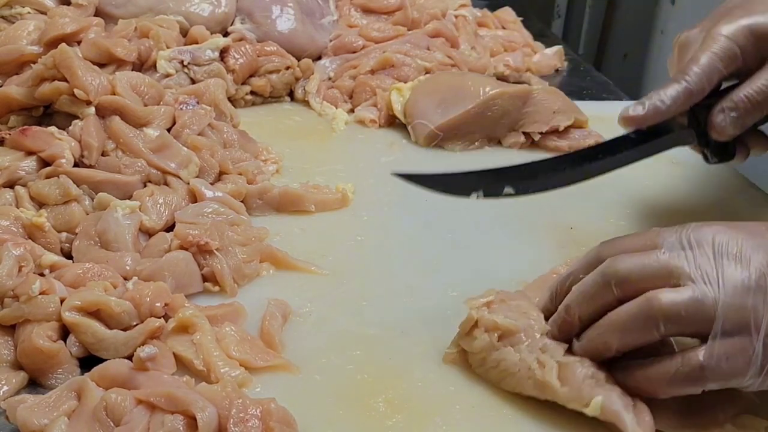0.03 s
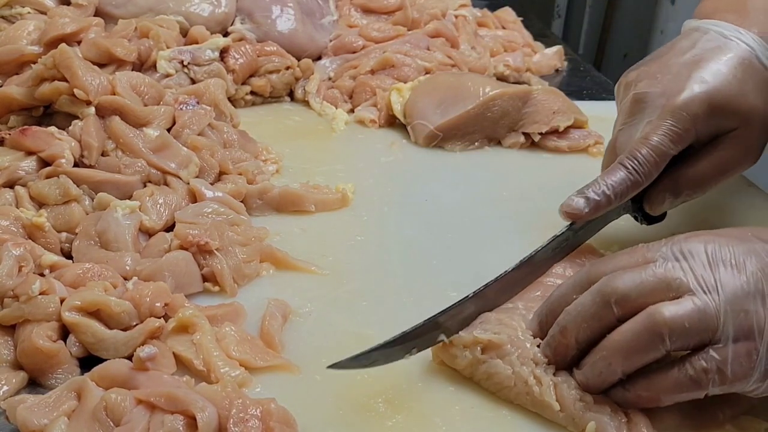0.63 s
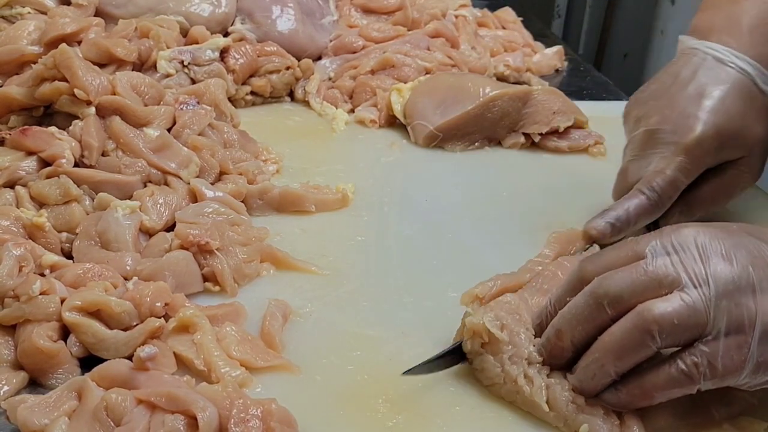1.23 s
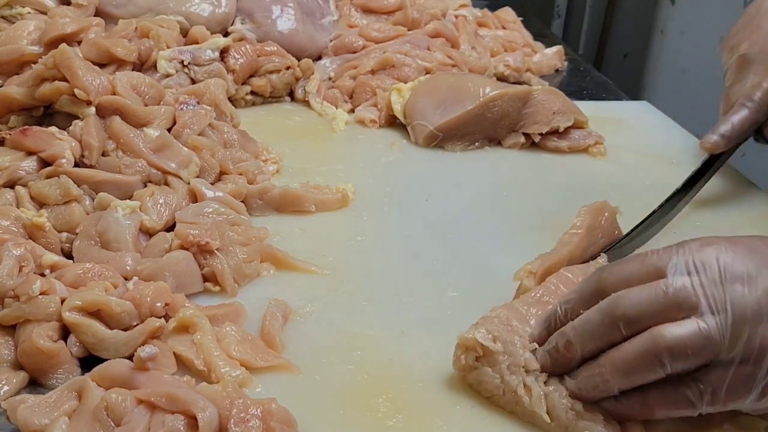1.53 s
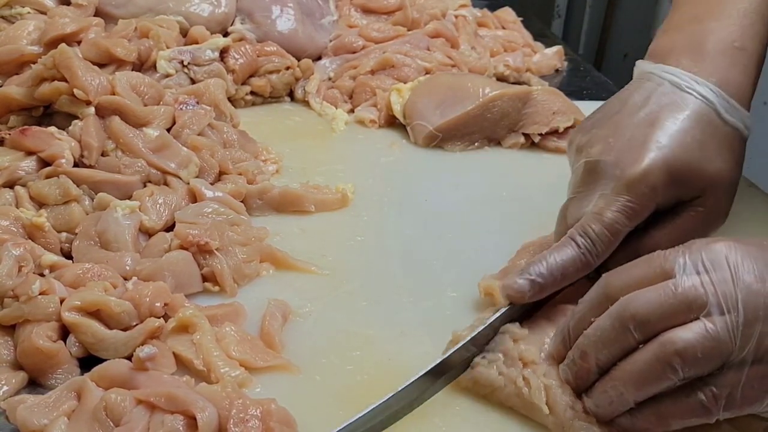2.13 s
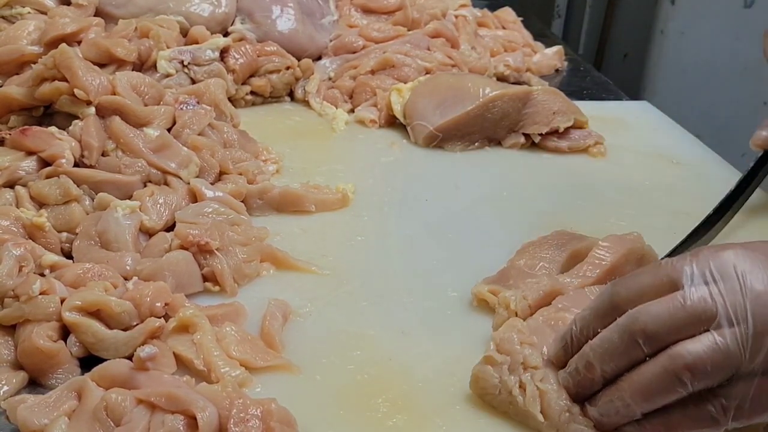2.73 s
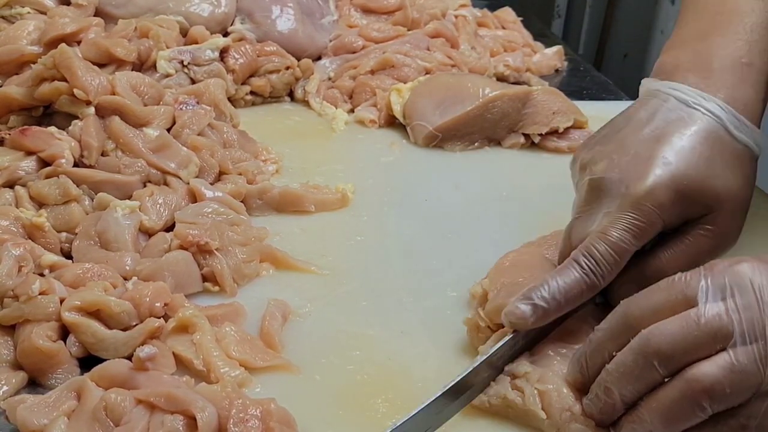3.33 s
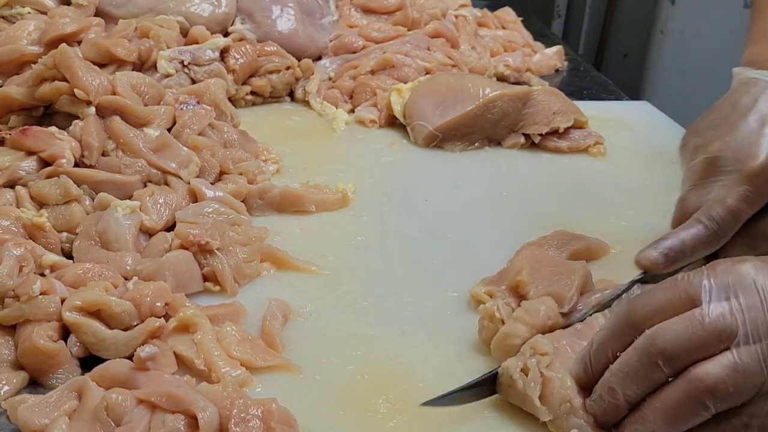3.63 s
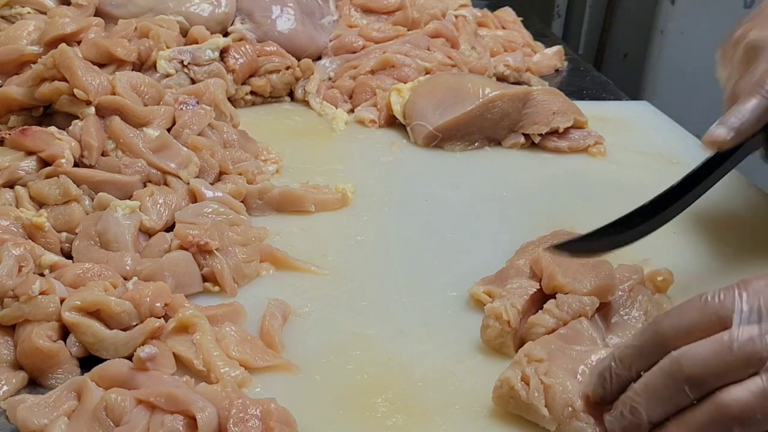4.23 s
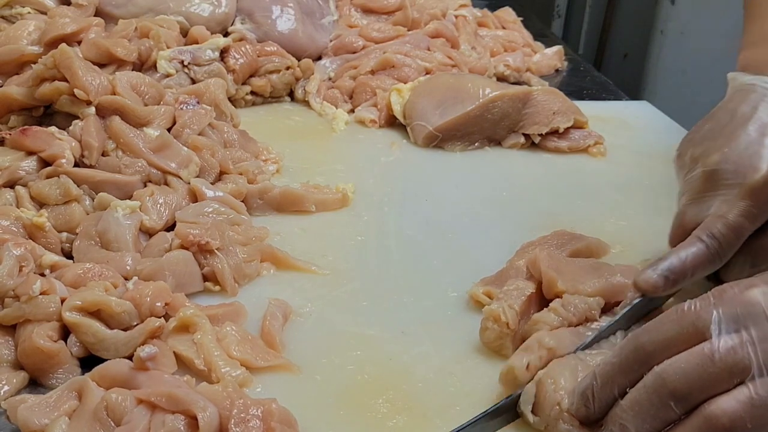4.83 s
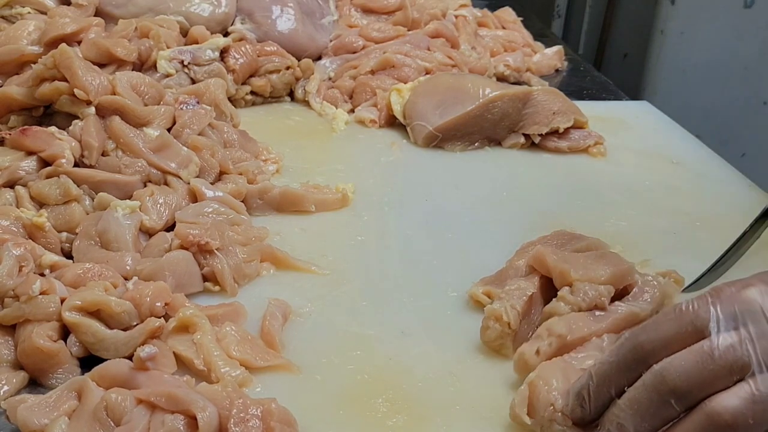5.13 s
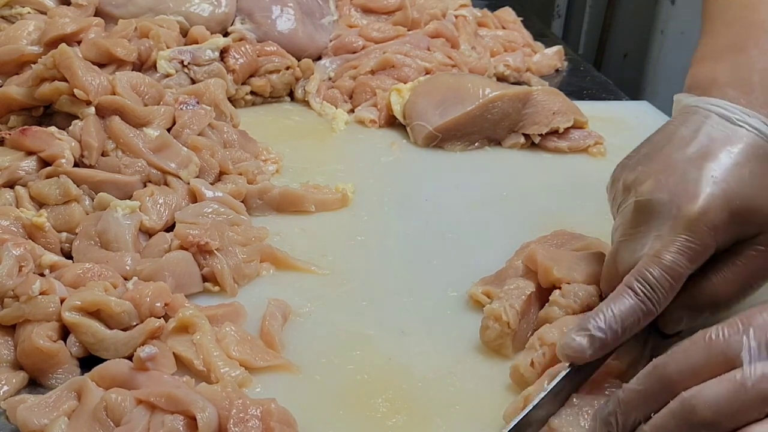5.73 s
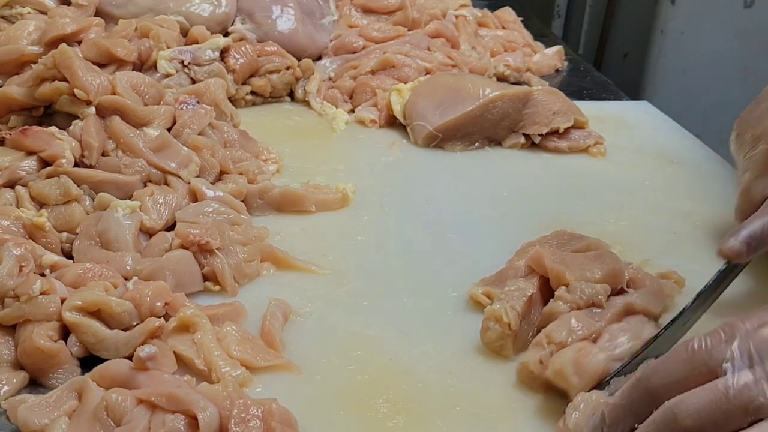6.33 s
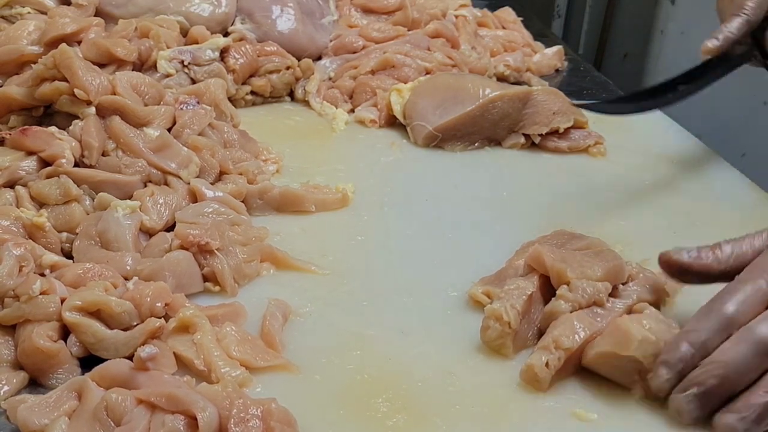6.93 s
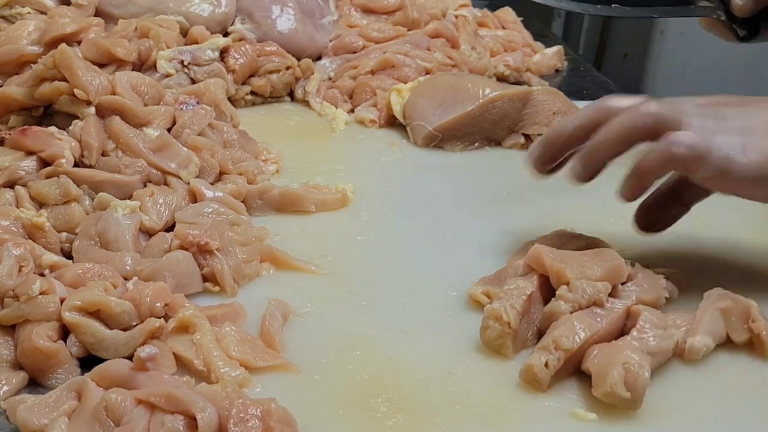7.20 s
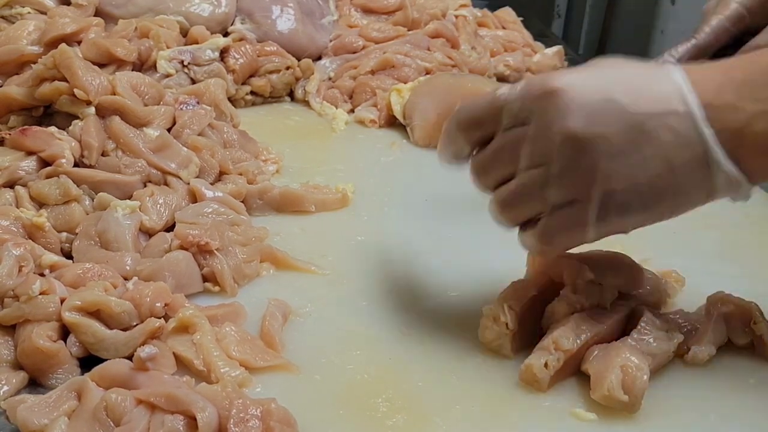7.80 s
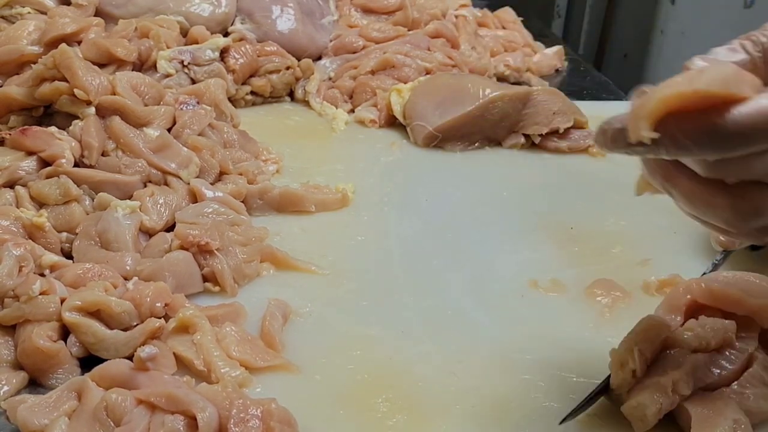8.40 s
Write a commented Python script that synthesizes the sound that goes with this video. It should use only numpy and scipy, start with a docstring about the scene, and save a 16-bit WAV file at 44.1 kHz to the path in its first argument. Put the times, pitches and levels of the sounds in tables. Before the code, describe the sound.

Over humming kitchen refrigerators, a blade taps and swishes through raw chicken, then clacks down and scrapes briefly across the cutting board.

```python
"""Slicing raw chicken

A knife slices raw chicken on a plastic board, in a kitchen where refrigeration units hum.
In each cut the edge knocks on the board and is drawn back with a soft swish, while films of
juice part and crackle. Then a gloved hand gathers the strips, and the blade clacks down and
scrapes under them."""
import sys
import numpy as np
from scipy import signal
from scipy.fft import rfft, irfft
from scipy.io import wavfile

SR = 44100
rng = np.random.default_rng(int(sys.argv[2]) if len(sys.argv) > 2 else 0)


def persist_wave(psi):
    """Save psi, clipped to +-1, as 16-bit WAV."""
    counts = np.round(np.clip(psi, -1, 1) * 32767).astype(np.int16)
    wavfile.write(sys.argv[1], SR, np.atleast_2d(counts).T)


N = 377496
TIME = np.arange(N) / SR
FREQS = np.fft.rfftfreq(N, 1 / SR)
TOP_HZ = 15900
CUT_ATTACK_S = .15  # the hand gathers speed

# Stereo image of the rubs and fizz on the board. Each row: frequency in Hz, left-right likeness (0-1).
BOARD_LIKENESS = [(200, 0.98), (1200, 1), (3000, 0.31), (7000, 0), (15000, 0)]
# The slicing strokes. Each row: start in seconds, length in seconds, rub level in dB,
# treble tilt in dB at the start, treble tilt in dB at the end, wet fizz level in dB.
CUTS = [(1.03, 0.43, -51.5, 14, -2.5, -65), (2.143, 0.51, -53, 9, -2, -63), (3.433, 0.43, -52.5, 3, 2, -64),
        (4.673, 0.45, -53, 4, 5, -67), (6.19, 0.36, -54.5, -14, 7, -63)]


def amp(db):
    """Decibels to gain."""
    return 10 ** (np.asarray(db) / 20)


def unit(x):
    """Scales to rms 1."""
    return x / np.sqrt(np.mean(x ** 2) + 1e-30)


def read(points, hz):
    """Reads a curve on a logarithmic frequency axis."""
    f, value = np.transpose(points)
    return np.interp(np.log(hz + 1), np.log(f + 1), value)


def add(mix, start_s, sound):
    """Mixes a sound in at its start time."""
    part = mix[..., max(round(start_s * SR), 0):][..., :sound.shape[-1]]
    part += sound[..., :part.shape[-1]]


def envelope(start, length, attack_s, release_s):
    """A straight rise, with a dying release once the length is over."""
    age = TIME - start
    return np.clip(age / attack_s, 0, 1) * np.exp(-np.maximum(age - length, 0) / release_s)


def drift(hz):
    """Smooth random wander of rms 1, rolling off around hz."""
    t = TIME[::32]
    lowpass = np.exp(-(np.fft.rfftfreq(len(t), t[1]) / hz) ** 2)
    slow = irfft(rfft(rng.standard_normal(len(t))) * lowpass, len(t))
    return unit(np.interp(TIME, t, slow))


def grains(per_s, spread_db):
    """Two trains of tiny random impulses of uneven size."""
    size = amp(spread_db * np.minimum(rng.exponential(1, (2, N)), 4))
    return size * rng.choice([-1, 1], (2, N)) * (rng.random((2, N)) < per_s / SR)


def coloured(pair, colour_db, likeness):
    """Gives two unrelated signals a tone colour and a stereo width."""
    a, b = rfft(pair)
    same = np.clip(read(likeness, FREQS), -1, 1)
    mid, side = a * np.sqrt(1 + same), b * np.sqrt(1 - same)
    return unit(irfft(np.array([mid + side, mid - side]) * amp(colour_db), N))


def patchy(x, depth_db, width_hz, hold_s):
    """Resonances that come and go, each about width_hz wide and hold_s long."""
    hz, t, spectra = signal.stft(x, SR, nperseg=1024)
    patches = rng.standard_normal(spectra.shape[1:])
    for axis, span in enumerate([width_hz / hz[1], hold_s / t[1]]):
        count = patches.shape[axis]
        blur = np.exp(-(2 * (np.arange(count) - count // 2) / span) ** 2)
        patches = signal.fftconvolve(patches, np.expand_dims(blur, 1 - axis), "same")
    return unit(signal.istft(spectra * amp(depth_db * unit(patches)), SR)[1][:, :N])


def ring(modes, tuning, contact_s):
    """Struck modes, neighbours in opposite phase; a cushioned contact leaves the high ones quiet."""
    t = TIME[:SR // 4]
    sound = sum((-1) ** k * amp(db - 60 * t / t60) * np.sin(2 * np.pi * hz * tuning * t)
                for k, (hz, db, t60) in enumerate(modes))
    force = np.sin(np.pi * np.minimum(t / max(contact_s, 3 / SR), 1)) ** 2
    sound = signal.fftconvolve(sound, force)[:len(t)]
    return sound / abs(sound).max()


def reflections(x, predelay_s, t60s, count=1200):
    """Sparse echoes of random sign, separate for each side, each band dying at its own speed."""
    taps = np.zeros((2, SR))
    at = np.arange(count) * 20 + rng.integers(0, 20, (2, count))
    np.put_along_axis(taps, at, rng.choice([-1., 1.], at.shape), 1)
    hz, t, spectra = signal.stft(taps, SR, nperseg=256)
    tail = signal.istft(spectra * amp(-60 * t / read(t60s, hz)[:, None]), SR)[1]
    tail = np.pad(tail / np.linalg.norm(tail[0]), ((0, 0), (round(predelay_s * SR), 0)))
    return signal.fftconvolve(x, tail, axes=1)[:, :N]


def refrigeration(waver=0.097, sway_rad=0.5, waver_hz=0.42, air_db=-36.5):
    """The background bed: slightly wavering motor tones in the rush of moving air."""
    # Compressor and fan tones. Each row: frequency in Hz, rms level in dB.
    tones = [(26.9, -48), (28.6, -59), (53.8, -52.5), (57.9, -42), (80.7, -34), (119.8, -42.5),
             (146.7, -57), (161.5, -50), (173.6, -52), (240, -59.5), (242.2, -52.5), (319, -70),
             (345.9, -48.5), (403.7, -51.5), (460.9, -53.5), (485.2, -65), (663.5, -64)]
    # Rush of the fans. Each row: frequency in Hz, relative level in dB.
    air_colour = [(15, -34), (28, -16), (41, -16), (60, 1.5), (85, 0.5), (132, -6), (190, -0.5), (265, -3),
                  (340, -9), (450, -12), (560, -14.5), (900, -19.5), (1400, -18.5), (1800, -27.5),
                  (2350, -31.5), (2900, -31), (3700, -37), (4600, -39), (6200, -49), (10000, -56),
                  (15500, -59.5)]
    # Stereo image of the rush. Each row: frequency in Hz, left-right likeness (0-1).
    air_likeness = [(60, 0.8), (130, 1), (280, .88), (550, 0.24), (1200, 0.19), (3000, 0.053), (7000, 0),
                    (15000, 0)]
    hum = np.zeros(N)
    for hz, db in tones:
        gain = amp(db) * (1 + waver * drift(waver_hz))
        hum += gain * np.sin(2 * np.pi * (hz * TIME + rng.random()) + sway_rad * drift(waver_hz))
    air = coloured(rng.standard_normal((2, N)), read(air_colour, FREQS), air_likeness)
    return np.sqrt(2) * hum + amp(air_db) * air


def wetness(drying_db_per_s=13):
    """The fizz's gain: faint and fitful under the holding hand, up in each cut and squelch."""
    # Meat parts from blade, glove or board. Each row: start in seconds, length in seconds, level in dB.
    squelches = [(0.068, 0.06, -58), (0.335, 0.023, -61), (.86, .06, -64), (1.093, 0.026, -56.5),
                 (1.16, .05, -59), (2.174, .032, -46.5), (2.46, 0.032, -57), (2.55, 0.055, -64),
                 (3.394, 0.022, -50.5), (3.593, 0.087, -57), (3.97, .04, -68), (4.648, 0.024, -59),
                 (4.907, 0.037, -54.5), (5, .02, -49), (5.14, .14, -66), (5.91, 0.17, -68),
                 (6.375, .022, -57), (6.632, 0.28, -60), (6.87, 0.21, -57), (7.278, 0.23, -61.5),
                 (7.574, 0.066, -54), (7.653, 0.065, -59.5), (7.975, 0.036, -58), (8.02, 0.47, -66)]
    gains = [amp(-76.5 + 5.5 * drift(hz=9))]  # the holding hand
    for start, length, *_, fizz_db in CUTS:
        drying_db = drying_db_per_s * np.maximum(TIME - start, 0)  # the blade leaves the meat
        gains.append(amp(fizz_db - drying_db) * envelope(start, length, CUT_ATTACK_S, release_s=.14))
    for start, length, db in squelches:
        gains.append(amp(db) * envelope(start, length, attack_s=0.49 * length, release_s=0.017))
    return np.sqrt(sum(gain ** 2 for gain in gains))


def wet_meat(trim_db=-0.5, clump_db=1.0):
    """Countless tiny films of juice part, in clumps; a few larger ones crackle above the fizz."""
    # The bright colour of the fizz. Each row: frequency in Hz, relative level in dB.
    wet_colour = [(2000, -7), (4500, 3), (6000, 5), (8000, 1.5), (10500, -1), (13000, 5), (14700, 1),
                  (15800, 1.5)]
    films = unit(grains(per_s=6000, spread_db=3)) + amp(-6) * unit(grains(per_s=200, spread_db=3))
    fizz = coloured(films, read(wet_colour, FREQS), BOARD_LIKENESS)
    fizz = patchy(fizz, depth_db=2.3, width_hz=800, hold_s=.018)
    return fizz * wetness() * amp(trim_db + clump_db * drift(hz=60))


def fibre_snaps(tick_s=0.00024, spatter_db=-16, spatter_s=0.012, width_octaves=0.48):
    """Wet films and fibres snap, each a sharp tick with a short spatter after it."""
    # The loudest snaps. Each row: start in seconds, peak level in dB, band centre in Hz.
    snaps = [(0.091, -51, 7000), (.1476, -42.5, 6330), (.5345, -43, 6500), (.6025, -52, 13000),
             (.7442, -52, 9500), (.9293, -45, 10900), (1.0447, -42, 12000), (1.1085, -38, 13000),
             (1.1244, -41, 13000), (2.1068, -47.5, 13000), (2.215, -39, 9000), (2.561, -35, 13500),
             (3.408, -39, 7000), (3.4109, -33, 14000), (4.738, -38, 5700), (4.8, -43, 6500),
             (4.923, -42, 9000), (4.9478, -42, 10100), (7.3019, -37, 3960), (7.4196, -41, 7000)]
    out, t = np.zeros((2, N)), TIME[:2048]
    hz = np.fft.rfftfreq(len(t), 1 / SR)
    fade = np.exp(-t / tick_s) + amp(spatter_db) * np.exp(-t / spatter_s)
    for start, peak_db, centre_hz in snaps:
        band = np.exp(-.5 * (np.log2((hz + 1) / centre_hz) / width_octaves) ** 2) * (hz < TOP_HZ)
        tick = irfft(rfft(rng.standard_normal((2, len(t)))) * band) * fade
        add(out, start, amp(peak_db) * tick / abs(tick.mean(0)).max())
    return out


def edge_swish(uneven_db=1, crossover_hz=4300):
    """The edge rubs over scored plastic; its resonances shift as the contact moves along the blade."""
    # Colour of the swish. Each row: frequency in Hz, relative level in dB.
    swish_colour = [(600, -10), (1400, 0), (2250, -5), (2650, -1.5), (3000, 3), (3300, -1), (3750, -8.5),
                    (4400, -6), (5300, -7), (6500, -14), (7400, -14.5), (9000, -20.5), (16000, -26)]
    # Brief hard rubs, as the edge bites through or the hand shoves the strips.
    # Each row: start in seconds, length in seconds, level in dB, treble tilt in dB.
    hard_rubs = [(2.183, 0.033, -52, 2), (4.936, .035, -51, 0), (5.007, 0.023, -41, 4),
                 (6.345, 0.03, -49, -6), (6.382, 0.011, -31.5, 4), (6.43, 0.031, -53, -12),
                 (6.848, 0.044, -52.5, 10), (7.279, 0.031, -50, -6), (7.34, 0.049, -58, -9),
                 (7.585, .04, -59, -3)]
    rub = coloured(grains(per_s=9000, spread_db=3.6), read(swish_colour, FREQS), BOARD_LIKENESS)
    rub = patchy(rub, depth_db=2.8, width_hz=220, hold_s=.05)
    body = irfft(rfft(rub) / (1 + (FREQS / crossover_hz) ** 6), N)
    strokes = []
    for start, length, db, first_db, last_db, _ in CUTS:
        gain = amp(db) * envelope(start, length, CUT_ATTACK_S, release_s=0.11)
        strokes.append((gain, np.interp(TIME, [start, start + length], [first_db, last_db])))
    for start, length, db, tilt_db in hard_rubs:
        strokes.append((amp(db) * envelope(start, length, attack_s=0.0064, release_s=0.01), tilt_db))
    # Half of the tilt lowers the body, half lifts the treble.
    body_gain = np.sqrt(sum(gain ** 2 / amp(tilt_db) for gain, tilt_db in strokes))
    treble_gain = np.sqrt(sum(gain ** 2 * amp(tilt_db) for gain, tilt_db in strokes))
    return (body * body_gain + (rub - body) * treble_gain) * amp(uneven_db * drift(hz=41))


def blade_scrape(chatter_db=2.0, attack_s=0.045):
    """Quick slips of steel on plastic excite the resonances of the blade."""
    # Broad colour of the scrape. Each row: frequency in Hz, relative level in dB.
    scrape_colour = [(400, 0), (1100, 6), (2000, -1), (3000, 5.5), (4000, -1), (5500, -1), (7500, -6),
                     (11000, -14), (15000, -10)]
    # Blade resonances. Each row: centre in Hz, width in Hz, boost in dB.
    resonances = [(1370, 140, 2), (2710, 230, 7), (3300, 150, 6), (4830, 100, 4), (6440, 370, 3),
                  (9000, 150, 7), (10030, 160, 13), (14750, 300, 0)]
    # The flat of the blade slides under the strips, then pushes them on.
    # Each row: start in seconds, length in seconds, level in dB, release in seconds.
    scrapes = [(8.055, 0.071, -33.5, 0.0094), (8.187, 0.075, -51.5, 0.036)]
    peaks_db = sum(db / (1 + (2 * (FREQS - hz) / width) ** 2) for hz, width, db in resonances)
    push = sum(amp(db) * envelope(start, length, attack_s, release_s)
               for start, length, db, release_s in scrapes)
    slips = grains(per_s=7000, spread_db=3.1)
    rasp = coloured(slips, read(scrape_colour, FREQS) + peaks_db, BOARD_LIKENESS)
    return rasp * push * amp(chatter_db * drift(hz=250))


def knife_knocks(rebound_s=.0068, rebound_loss_db=6, rebound_softening=1.45):
    """Board, blade and table ring together at each blow; a loosely held blade rebounds."""
    # The blade meets the board. Each row: start in seconds, board level in dB, contact time in seconds,
    # tuning ratio of board and steel, steel clack in dB, table thud in dB, rebounds (rounded).
    blows = [(0.8868, -21, .00072, 0.92, -32.5, -40, 0), (2.113, -37, .00075, .96, -66, -60, 0),
             (2.1902, -28.5, 0.00053, .96, -49, -55, 0), (4.5089, -18, 0.00024, 1.03, -30.5, -30, 0),
             (5.0256, -46, 0.00011, 0.98, -32.5, -57, 0), (5.7632, -27, .0004, 0.85, -40, -56, 0),
             (6.3871, -25.5, 0.00015, .95, -24.5, -37, 1), (7.9924, -21.5, 0.00018, 1.02, -23, -19, 0.5),
             (8.0383, -22.5, 0.0002, 1.04, -28.5, -21, 3), (8.0689, -29, .0001, 0.81, -29.5, -21.5, 2),
             (8.244, -36, .00076, 1.06, -35, -29, 0), (8.345, -54, .0002, 1.16, -41, -45, 0)]
    # Modes of the plastic board, the blade pressed on it and the table underneath.
    # Each row: frequency in Hz before tuning, relative level in dB, time to fall 60 dB in seconds.
    board_modes = [(704, -3.5, 0.024), (860, 1, 0.018), (1034, 7.5, 0.024), (1134, 7, 0.027),
                   (1340, 2.5, 0.015)]
    steel_modes = [(1530, -2, 0.016), (1861, 0.5, 0.051), (1858, 1.5, 0.025), (2380, -6, 0.02),
                   (2850, -5, 0.021), (3280, -3.5, 0.0098), (4340, -10, 0.01), (5230, -10, 0.0098),
                   (6540, -14, .012), (9200, -17, .006)]
    table_modes = [(104, -4, 0.28), (199, 1.5, 0.22), (374, 0.5, 0.063), (502, -5.5, 0.11),
                   (810, -5.5, 0.012)]
    clacks, thuds = np.zeros((2, N)), np.zeros((2, N))
    for start, board_db, contact_s, tuning, steel_db, thud_db, rebounds in blows:
        for k in range(round(rebounds) + 1):
            at, gain = start + k * rebound_s, amp(-k * rebound_loss_db)
            touch_s = contact_s * rebound_softening ** k
            board = amp(board_db) * ring(board_modes, tuning, touch_s)
            steel = amp(steel_db) * ring(steel_modes, tuning, touch_s)
            add(clacks, at, gain * (board + steel))
            add(thuds, at, gain * amp(thud_db) * ring(table_modes, tuning=0.92, contact_s=touch_s))
    nearby_surfaces = reflections(clacks, predelay_s=0.00391, t60s=[(1000, .055)])
    return clacks + thuds + amp(-8) * nearby_surfaces


def scene(room_db=-7.5):
    """The work on the board and its kitchen reverb, over the hum of the machines."""
    # Kitchen reverb. Each row: frequency in Hz, time to fall 60 dB in seconds.
    kitchen_decay = [(150, 0.56), (1000, 0.15), (4000, 0.2), (15000, 0.088)]
    # Panning of the knife work. Each row: frequency in Hz, left minus right in dB.
    balance = [(200, 3), (1200, -3), (4000, -2.5), (8000, 0.5), (15000, -0.5)]
    work = edge_swish() + wet_meat() + fibre_snaps() + knife_knocks() + blade_scrape()
    work = work + amp(room_db) * reflections(work, predelay_s=.012, t60s=kitchen_decay)
    pan = amp(np.outer([.5, -.5], read(balance, FREQS)))
    work = irfft(rfft(work) * pan, N)
    return work + refrigeration() * amp([[-.2], [.2]])  # the bed leans a touch to the right


def record(dry):
    """A steep low-pass trims the very top of the mix."""
    lowpass = signal.firwin(511, TOP_HZ, window=("kaiser", 9), fs=SR)
    return signal.oaconvolve(dry, lowpass[None], "same", axes=1)


dry = scene()
out = record(dry)
persist_wave(out)
```